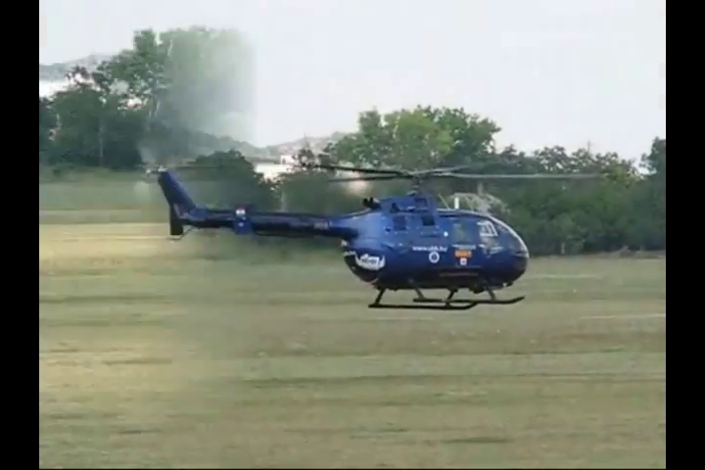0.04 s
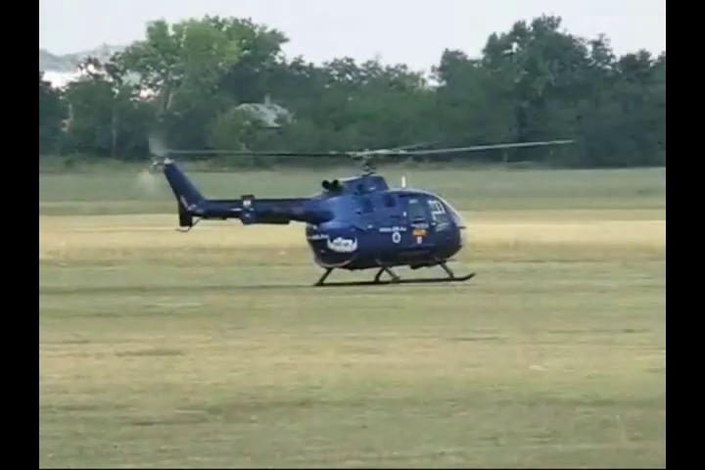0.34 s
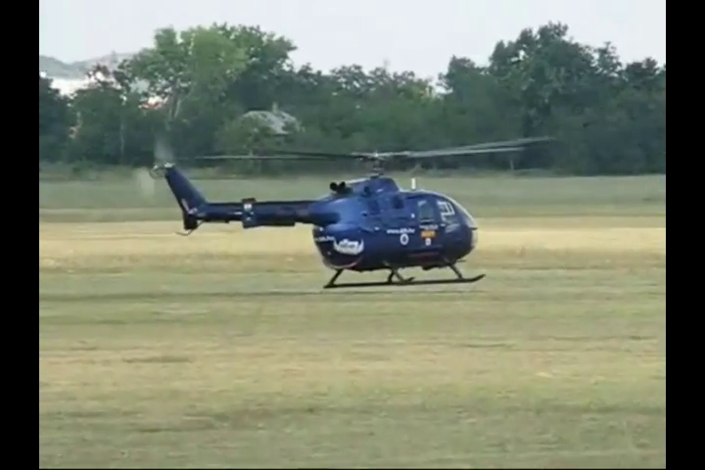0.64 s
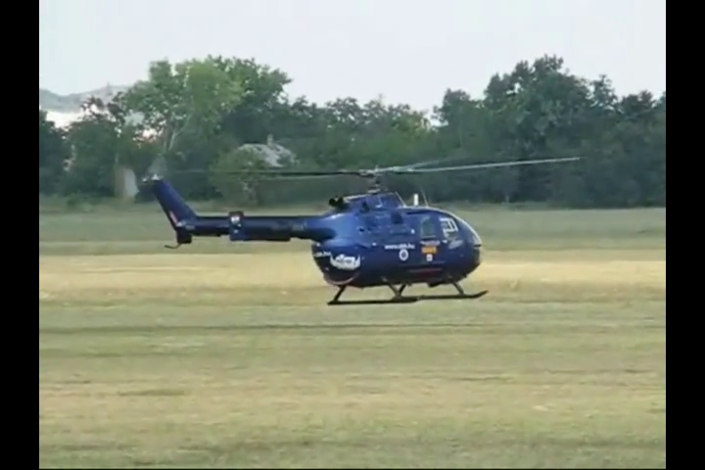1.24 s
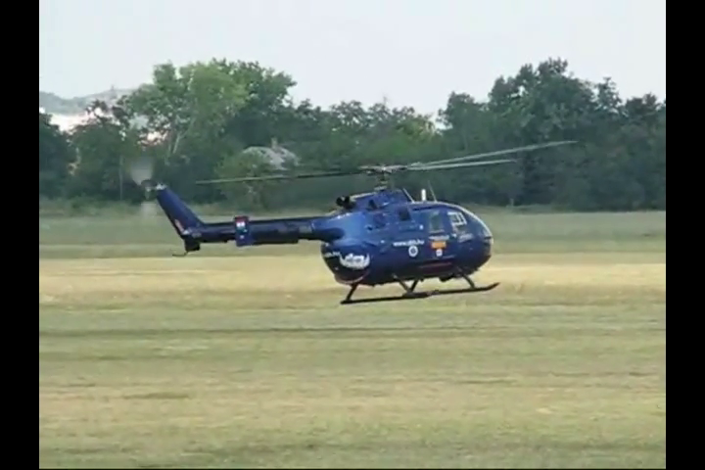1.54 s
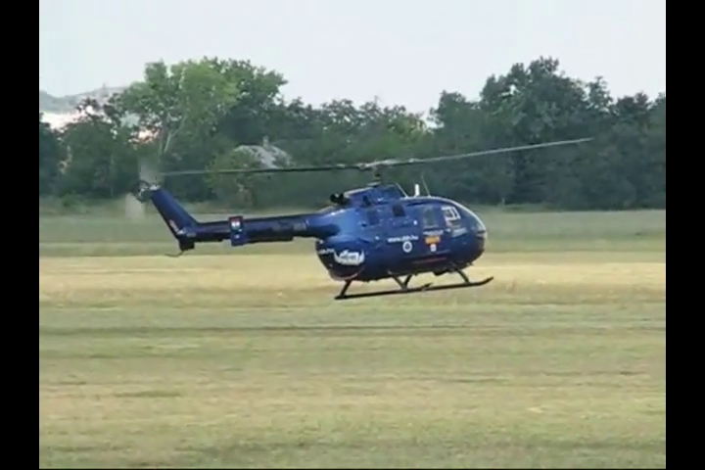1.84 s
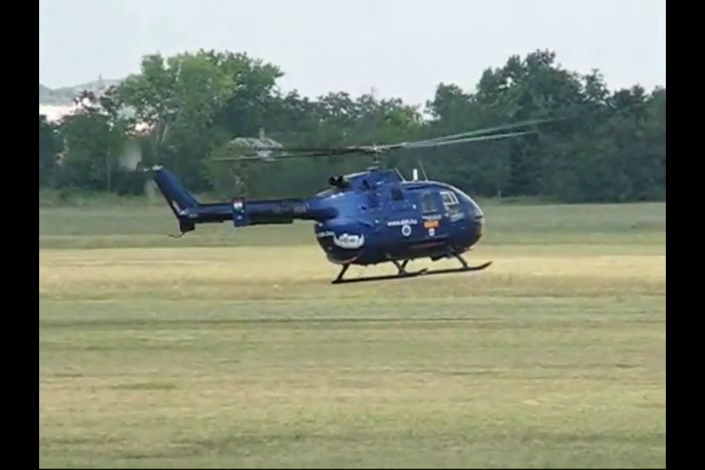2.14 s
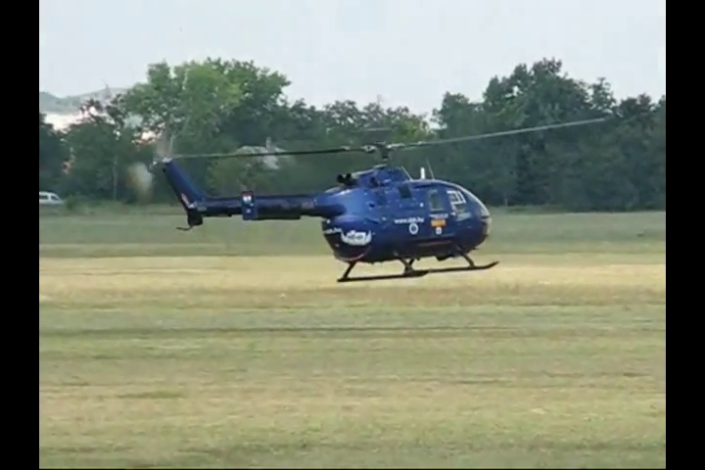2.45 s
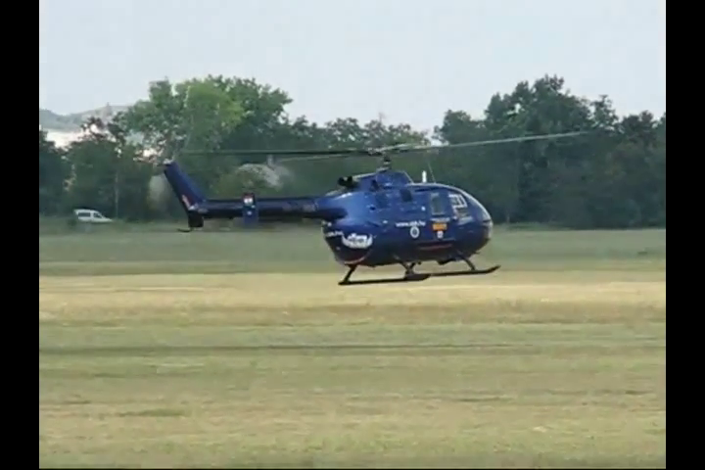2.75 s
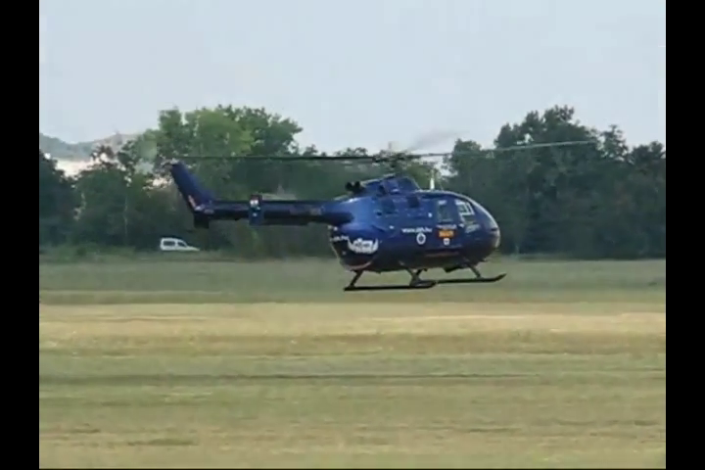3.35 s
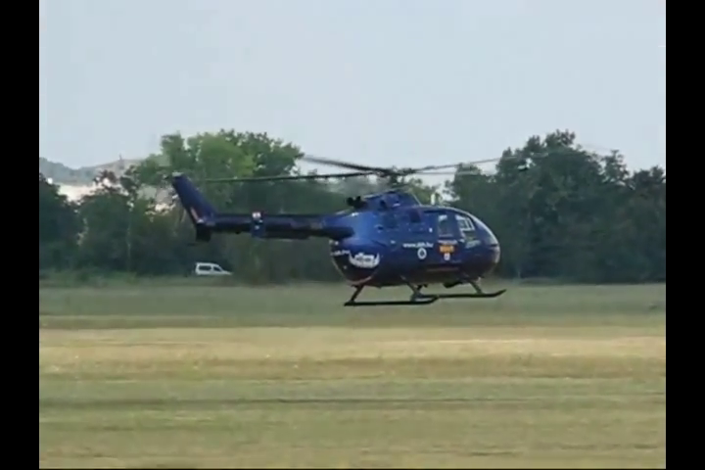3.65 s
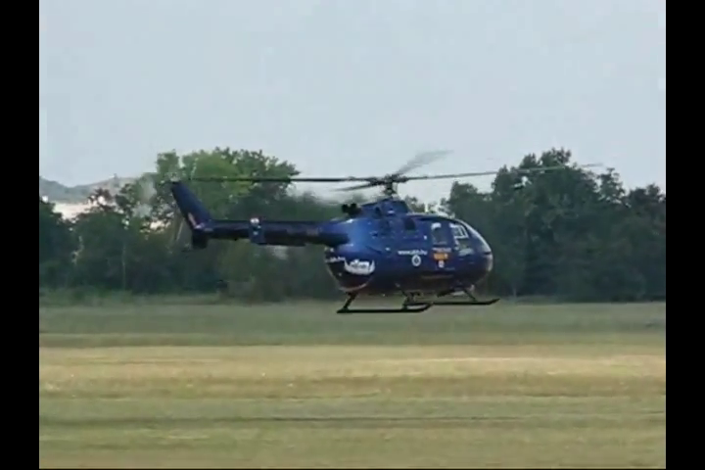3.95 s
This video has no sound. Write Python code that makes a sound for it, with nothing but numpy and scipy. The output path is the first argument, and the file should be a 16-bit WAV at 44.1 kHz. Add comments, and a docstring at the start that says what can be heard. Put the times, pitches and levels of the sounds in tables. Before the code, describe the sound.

Rapid helicopter rotor chop with sharp blade slaps, exhaust roar and a thin turbine whine.

```python
"""The thump, swish and slap of rotor blades, 28 a second: a light turbine helicopter hovers low over grass,
drifting sideways past the listener. The blades slap hard whenever they cut their own tip vortices
squarely. Under them run the buzz of the tail rotor, the rumble and roar of exhaust and downwash,
and a thin whine of turbine and gears."""
import sys
import numpy as np
from scipy import signal
from scipy.fft import rfft, irfft
from scipy.io import wavfile
from scipy.ndimage import uniform_filter1d

SR = 44100
rng = np.random.default_rng(int(sys.argv[2]) if len(sys.argv) > 2 else 0)


def pcm_store(signal):
    """Save signal as 16-bit PCM."""
    levels = np.round(np.clip(np.atleast_2d(signal), -1, 1) * 32767)
    wavfile.write(sys.argv[1], SR, levels.astype(np.int16).T)


N = 176400
BLADE_HZ = 27.97
# how hard the blades bite the wake, for swish and ordinary slaps (time [s], relative level [dB])
WAKE_BITE = [(0, -17), (.29, -6.5), (.39, -3), (.6, -0.5), (.7, -2), (.83, -3.5), (.95, -6.5), (1.1, -2.5),
             (1.2, -7), (1.42, -1), (1.75, -2.5), (2, -2.5), (2.3, -3.5), (2.6, -2.5), (2.8, -6.5),
             (3.1, 0), (3.5, 2), (4, -0.5)]


def amp(db):
    """Decibels to gain."""
    return 10 ** (np.asarray(db) / 20)


def unit(x):
    """Scales to rms 1."""
    return x / np.sqrt(np.mean(abs(x) ** 2) + 1e-20)


def clock():
    """Seconds at every sample."""
    return np.arange(N) / SR


def curve(rows):
    """The columns of an automation table at every sample."""
    times, *columns = np.transpose(rows)
    return np.squeeze([np.interp(clock(), times, column) for column in columns])


def spectrum(points):
    """A table over frequency at every bin."""
    hz, value = np.transpose(points)
    return np.interp(np.log(np.fft.rfftfreq(N, 1 / SR) + 1), np.log(hz + 1), value)


def colour(x, points):
    """Minimum-phase EQ that keeps the power of white noise."""
    cepstrum = irfft(np.log(unit(amp(spectrum(points)))), N)
    cepstrum[1:N // 2] *= 2
    cepstrum[N // 2 + 1:] = 0
    return irfft(rfft(x) * np.exp(rfft(cepstrum)), N)


def wander(hz):
    """Smooth random modulation of rms 1, up to about the given rate."""
    lowpass = np.exp(-(np.fft.rfftfreq(N, 1 / SR) / hz) ** 2)
    return unit(irfft(rfft(rng.standard_normal(N)) * lowpass, N))


def add(mix, s, sound):
    """Mixes a sound in, centred on the time s."""
    at = round(s * SR) - len(sound) // 2 + np.arange(len(sound))
    inside = (at >= 0) & (at < N)
    mix[at[inside]] += sound[inside]


def air_noise(eq):
    """Coloured stereo noise, made patchy by the moving air."""
    # likeness of left and right (frequency [Hz], coherence [0-1])
    coherence = [(150, .98), (700, .95), (1500, .86), (3500, .89), (5500, .75), (6700, .89), (7700, .62),
                 (9200, .95)]
    alike = spectrum(coherence)
    mid, side = rfft(rng.standard_normal((2, N))) * np.sqrt([(1 + alike) / 2, (1 - alike) / 2])
    frames = signal.stft(irfft([mid + side, mid - side], N), nperseg=512)[2]
    patches = uniform_filter1d(rng.standard_normal(frames.shape[1:]), size=5, axis=0)
    patch_db = unit(uniform_filter1d(patches, size=7, axis=1))
    patchy = signal.istft(frames * amp(patch_db), nperseg=512)[1][:, :N]
    return unit(colour(patchy, eq))


def blade_turns(offset_s=0.0042):
    """Count of blade passes; a pulse arrives at each whole number."""
    # pulse lag as the helicopter drifts and tilts (time [s], delay [ms])
    drift = [(0, -2), (.4, -0.16), (.8, 1.5), (1.2, 2), (1.8, 5), (2.2, 0.5), (2.75, -0.5), (3.45, 0),
             (4, -4)]
    return (clock() - offset_s - curve(drift) / 1000) * BLADE_HZ + 1


def rotor_thump(waver_db=1.0, smear_rad=0.81):
    """The low push of each passing blade."""
    # partials of the push (harmonic [x blade rate], level [dB])
    harmonics = [(1, -58), (2, -46), (3, -42.5), (4, -48), (5, -44.5), (6, -41), (7, -41), (8, -43),
                 (9, -46.5), (10, -42.5), (11, -44.5), (17, -44.5), (19, -49)]
    # weight of the thump (time [s], gain [dB])
    weight = [(0, -10), (.25, 0.5), (.45, -1.5), (1.1, -1), (2.5, -1.5), (3.3, 2), (4, -1)]
    phase = 2 * np.pi * blade_turns()
    thump = np.zeros(N)
    for k, db in harmonics:
        level = amp(db + waver_db * wander(0.82))
        thump -= level * np.cos(round(k) * phase + smear_rad * wander(4.7))
    return np.sqrt(2) * amp(curve(weight)) * thump


def blade_swish(trim_db=-18.5, lead_s=0.002, width_s=0.0035):
    """A puff of hiss as each blade runs into the wake, just ahead of its slap."""
    # airy tone of the puff (frequency [Hz], relative level [dB])
    swish_eq = [(100, -14), (400, -9), (700, -4.5), (1500, 1.5), (3500, -4.5), (6000, -14), (8000, -21.5),
                (10500, -50)]
    turns = blade_turns()
    since_pass = (turns - np.round(turns)) / BLADE_HZ
    puffs = np.exp(-.5 * ((since_pass + lead_s) / width_s) ** 2)
    return amp(curve(WAKE_BITE) + trim_db) * puffs * air_noise(swish_eq)


def vortex_strike(knock_hz, rise_s=0.0011, fall_s=0.00038, shock_gap_s=0.000847, shock_share=0.37):
    """One slap: a crack of three pressure shocks in a burst of turbulence, and a short pitched knock."""
    t = np.arange(-400, 400) / SR
    envelope = np.exp(np.minimum(t / rise_s, -t / fall_s))
    burst = unit(envelope * rng.standard_normal(len(t)))
    before, after = shock_gap_s * np.exp(0.34 * rng.standard_normal(2))
    shocks = unit(-.6 * np.sinc((t + before) * SR) + np.sinc(t * SR) - 1.2 * np.sinc((t - after) * SR))
    cycles = t * knock_hz
    knock = unit(np.exp(-.5 * cycles ** 2) * np.sin(2 * np.pi * (cycles + rng.random())))
    return shock_share * shocks + (1 - shock_share) * burst, knock


def blade_slap(trim_db=-21.5, spread_db=0.66, jitter_s=0.0004, typical_knock_hz=1167):
    """Every blade cuts a tip vortex; some hit it squarely and slap hard."""
    # square hits (time [s], crack level [dB], hollow knock level [dB], knock pitch [Hz])
    hard_slaps = [(0.362, -28, -23, 1260), (0.4331, -23, -25.5, 1690), (0.5412, -18.5, -24.5, 685),
                  (0.6128, -17, -26, 3550), (0.6474, -24, -21, 1400), (0.6824, -25, -19.5, 1230),
                  (0.7566, -22, -22.5, 1120), (0.7923, -19.5, -33, 1800), (0.8277, -22, -24, 1260),
                  (0.862, -26.5, -23.5, 1610), (0.898, -25, -27, 1210), (0.97, -31, -25.5, 1200),
                  (1.0053, -26.5, -28, 1720), (1.1139, -21.5, -28.5, 1280), (1.295, -25, -23.5, 1180),
                  (1.4372, -20, -29, 1680), (1.618, -21, -25, 1540), (1.7596, -20, -25, 1220),
                  (2.581, -20, -25, 1460), (3.0437, -22, -17.5, 660), (3.0778, -18.5, -21, 687),
                  (3.149, -27, -24, 710), (3.3657, -18, -20, 1600), (3.4372, -21, -23, 820),
                  (3.4725, -14, -19, 820), (3.5404, -16.5, -19, 1260), (3.652, -16, -17.5, 2366),
                  (3.6853, -18, -25, 2630), (3.7913, -16.5, -30, 674), (3.969, -18.5, -25, 670)]
    # tone of the crack (frequency [Hz], relative level [dB])
    crack_eq = [(60, -22), (200, -11.5), (380, -2.5), (650, 5.5), (1200, 2.5), (1800, 4.5), (2500, 1),
                (3800, -0.5), (5500, -15), (8000, -25.5), (10500, -52)]
    passes = np.flatnonzero(np.diff(np.floor(blade_turns())) > 0)
    bite_db, hard_times = curve(WAKE_BITE), np.array(hard_slaps)[:, 0]
    strikes = list(hard_slaps)
    for i in passes:
        late, force, pitch = rng.standard_normal(3)
        if abs(hard_times - i / SR).min() > .5 / BLADE_HZ:  # ordinary slaps fill the other passes
            db = bite_db[i] + trim_db + spread_db * force
            strikes.append((i / SR + jitter_s * late, db, db - 7, typical_knock_hz * np.exp(0.2 * pitch)))
    ring = colour(signal.unit_impulse(N), crack_eq)[:400]
    slaps = np.zeros(N)
    for s, crack_db, knock_db, knock_hz in strikes:
        crack, knock = vortex_strike(knock_hz)
        crack = unit(np.convolve(crack, ring)[:len(crack)])
        add(slaps, s, amp(crack_db) * crack + amp(knock_db) * knock)
    return slaps


def blade_brightness(x, shelf_hz=3930):
    """A moving treble shelf: swish and slap start crisp and end dull."""
    # treble ride (time [s], gain [dB])
    shelf = [(0, 10), (.4, 8), (.61, 5), (.67, -0.5), (1.4, 3.5), (3, -0.5), (4, -9)]
    highpass = 1 / (1 + (shelf_hz / (np.fft.rfftfreq(N, 1 / SR) + 1)) ** 4)
    treble = irfft(rfft(x) * highpass, N)
    return x + (amp(curve(shelf)) - 1) * treble


def tail_rotor(buzz_hz=73.54, waver_db=2.2, smear_rad=0.28):
    """A buzz at the blade rate of the tail rotor, unsteady in the main rotor's wake."""
    # swells of the buzz (time [s], fundamental level [dB], overtone level [dB])
    swells = [(0, -36.5, -26.5), (.31, -35, -25), (.42, -51, -37), (.9, -44, -37), (1.3, -35, -31),
              (1.8, -42, -33.5), (2.05, -33.5, -36), (2.3, -28.5, -32), (2.55, -29, -33.5),
              (2.75, -36, -37.5), (3.3, -36.5, -31), (4, -46, -52)]
    # overtones (harmonic [x tail blade rate], relative level [dB])
    harmonics = [(2, -1.5), (3, -5.5), (4, -11.5), (5, -15.5), (6, -15), (7, -15.5)]
    fundamental_db, overtone_db = curve(swells)
    phase = 2 * np.pi * np.cumsum(buzz_hz * (1 + 0.00423 * wander(2.94))) / SR
    overtones = np.zeros(N)
    for k, db in harmonics:
        level = amp(db + waver_db * wander(8.0))
        overtones += level * np.cos(round(k) * phase + smear_rad * wander(22) + 2 * np.pi * rng.random())
    return np.sqrt(2) * (amp(fundamental_db) * np.cos(phase) + amp(overtone_db) * overtones)


def downwash_and_exhaust(chop_db=0.37, flutter_db=1.7, throb_db=0.5):
    """Rushing air and exhaust, chopped at twice the blade rate, over a throbbing rumble; hiss on top."""
    # fader rides of the four noise beds (time [s], relative level [dB])
    roar_ride = [(0.0, -21.5), (0.2, -25), (0.88, -30), (1.08, -27), (1.45, -22), (1.99, -23), (2.27, -21),
                 (2.81, -22), (3.2, -20), (3.47, -24), (3.92, -27)]
    exhaust_ride = [(0.08, -23), (0.3, -25.5), (1.24, -30), (1.6, -26.5), (1.83, -31), (2.26, -23.5),
                    (2.8, -21.5), (3.17, -19.5), (3.42, -25), (3.69, -27.5)]
    hiss_ride = [(0.0, -33.5), (0.9, -41.5), (1.63, -34), (1.86, -36), (2.7, -35.5), (3.0, -33),
                 (3.48, -34), (3.64, -42)]
    rumble_ride = [(0, -21), (.27, -25.5), (.38, -34.5), (.75, -24.5), (.92, -40.5), (1.2, -28),
                   (1.6, -22.5), (1.86, -29), (2.28, -22), (2.44, -27), (2.56, -19.5), (2.64, -34),
                   (2.86, -25), (3.3, -29.5), (4, -47)]
    # their tone colours (frequency [Hz], relative level [dB])
    roar_eq = [(300, -19.5), (900, 1.5), (1300, 2.5), (1500, -1.5), (1850, 2.5), (2200, -1), (2900, -0.5),
               (3700, -3), (4500, -5.5), (6000, -15), (8000, -43)]
    exhaust_eq = [(100, -21.5), (330, -1.5), (410, -10), (500, -1.5), (650, 2.5), (800, 3.5), (1050, -2.5),
                  (1400, -13), (2500, -40.5)]
    hiss_eq = [(2500, -5.5), (4500, 0.5), (6200, 5), (7500, 1), (8800, -1.5), (9700, -8), (10500, -21.5)]
    rumble_eq = [(20, -26), (40, -15), (70, -9.5), (100, -3), (130, -8.5), (165, 4), (215, 1.5),
                 (255, -6.5), (310, -3), (400, -20.5), (600, -44.5)]
    phase = 2 * np.pi * blade_turns()
    chop = amp(chop_db * np.cos(2 * phase) + flutter_db * wander(160))
    roar = amp(curve(roar_ride) - 1) * air_noise(roar_eq)
    exhaust = amp(curve(exhaust_ride) - 3) * air_noise(exhaust_eq)
    hiss = amp(curve(hiss_ride) + 2 + 0.92 * wander(110)) * air_noise(hiss_eq)
    rumble = amp(curve(rumble_ride) - 1.5 + throb_db * np.cos(phase)) * air_noise(rumble_eq)
    return chop * (roar + exhaust) + hiss + rumble


def turbine(whine_hz=3055, fuzz_hz=40, steady_core=1.3):
    """Whistles of turbine and gears: steady tones with a fuzzy edge, drifting slightly in pitch."""
    # swells of the whine (time [s], level [dB])
    swells = [(0, -43), (.8, -52), (1.25, -43), (1.95, -45), (2.21, -30), (2.65, -40), (2.98, -26.5),
              (3.17, -37), (3.37, -29), (3.7, -35)]
    # whistles (pitch [x whine pitch], relative level [dB])
    partials = [(1, -2), (1.5, -13.5), (1.615, -12.5), (2.01, -16.5)]
    phase = 2 * np.pi * np.cumsum(whine_hz * (1 + 0.00304 * wander(2.12))) / SR
    whine = np.zeros(N)
    for ratio, db in partials:
        tone = (steady_core + wander(fuzz_hz)) * np.cos(ratio * phase)
        whine += amp(db) * unit(tone + wander(fuzz_hz) * np.sin(ratio * phase))
    return amp(curve(swells)) * whine


def scene():
    """The whole helicopter, main rotor in front."""
    main_rotor = rotor_thump() + blade_brightness(blade_swish() + blade_slap())
    return main_rotor + tail_rotor() + downwash_and_exhaust() + turbine()


def record(dry, ceiling=0.88, cutoff_hz=10500):
    """Two microphones, unlike in colour and phase, then a soft clip and a low-pass."""
    # stereo balance (frequency [Hz], left over right [dB])
    balance = [(1450, 0), (2350, -3.5), (3000, -4), (4200, -2.3), (5000, 1), (5480, 7), (6200, 1),
               (7000, 1), (7600, 5.5), (8400, -4), (9300, 6)]
    # stereo phase (frequency [Hz], left lead [rad])
    left_lead = [(700, -.12), (1000, -.3), (1900, -.25), (3600, .28), (4400, .58), (5350, .63),
                 (6050, -.05), (7100, -.05), (7750, -.5), (9000, 0)]
    left_response = amp(spectrum(balance) / 2) * np.exp(.5j * spectrum(left_lead))
    pair = irfft(rfft(dry) * np.array([left_response, 1 / left_response]), N)
    rounded = pair / (1 + (pair / ceiling) ** 4) ** .25
    lowpass = signal.firwin(401, cutoff_hz, window=("kaiser", 9), fs=SR)
    return signal.oaconvolve(rounded, lowpass[None], "same")


dry = scene()
out = record(dry)
pcm_store(out)
```